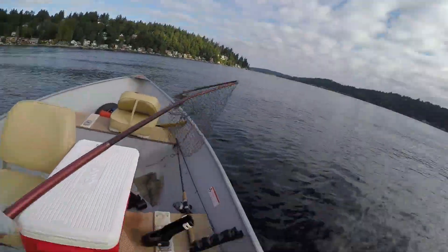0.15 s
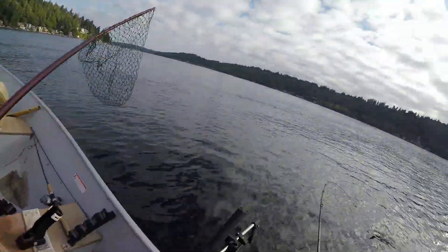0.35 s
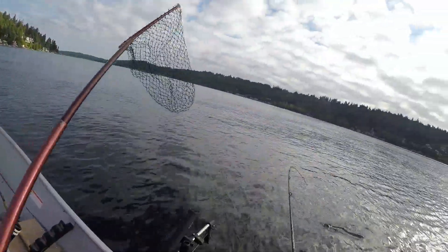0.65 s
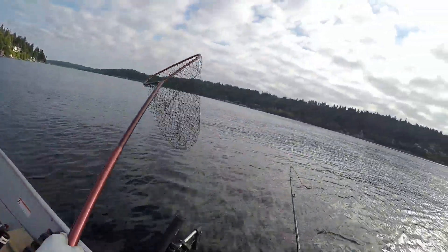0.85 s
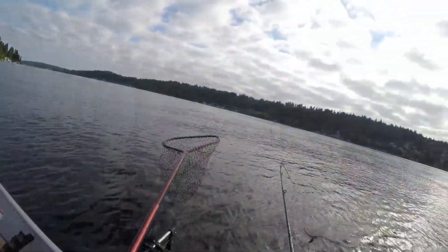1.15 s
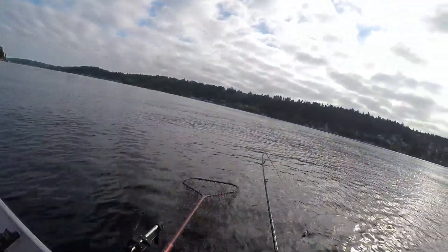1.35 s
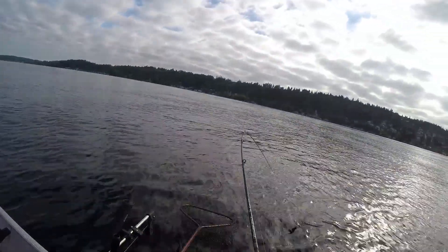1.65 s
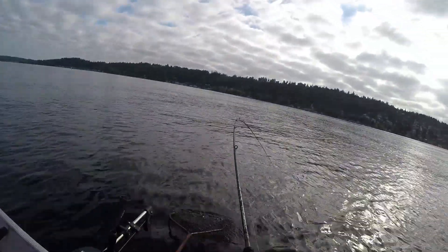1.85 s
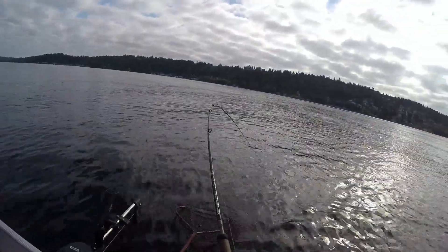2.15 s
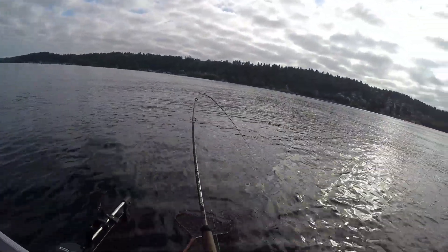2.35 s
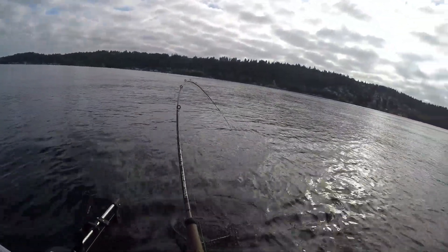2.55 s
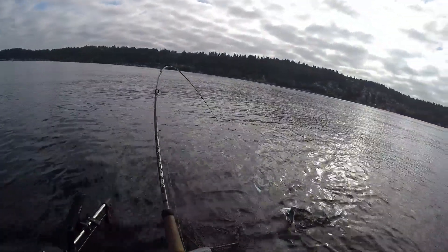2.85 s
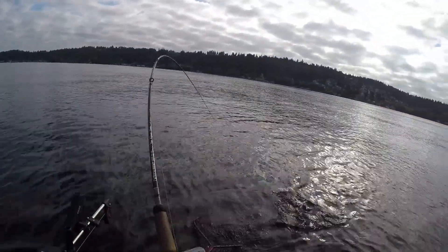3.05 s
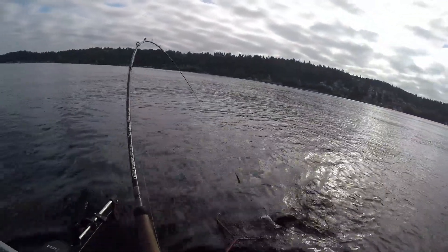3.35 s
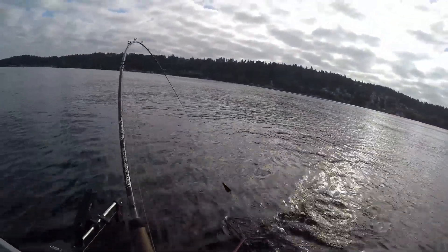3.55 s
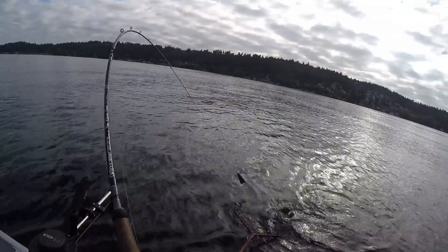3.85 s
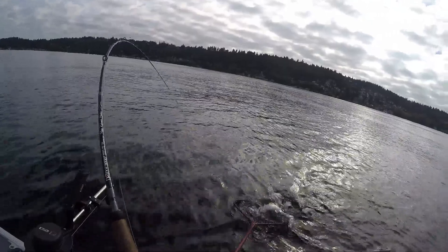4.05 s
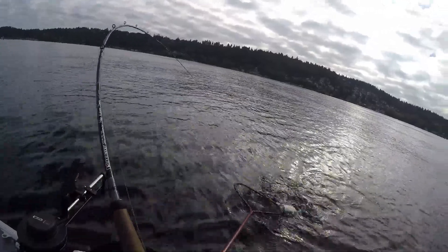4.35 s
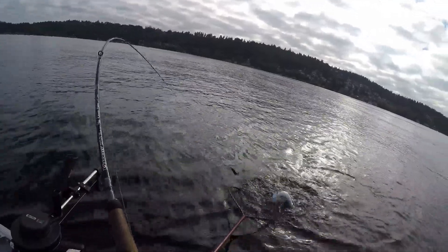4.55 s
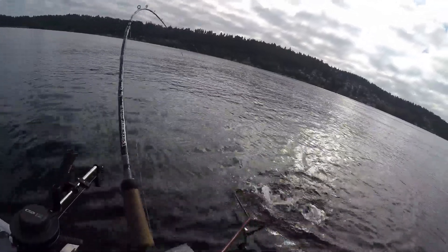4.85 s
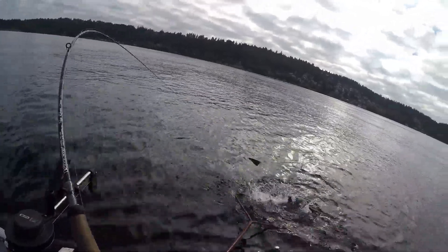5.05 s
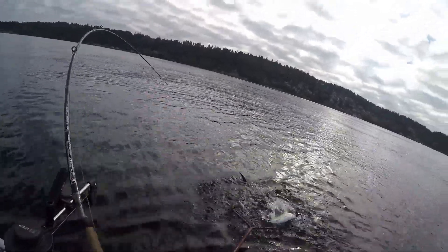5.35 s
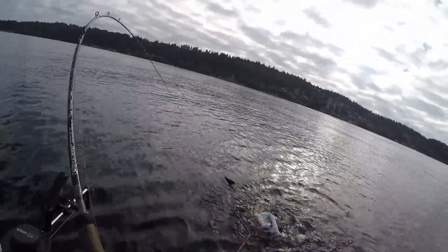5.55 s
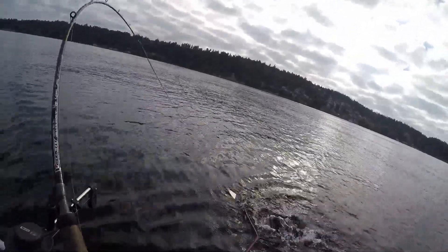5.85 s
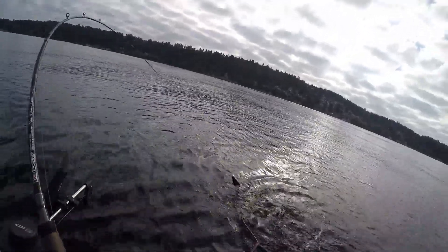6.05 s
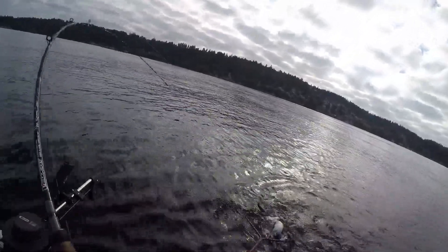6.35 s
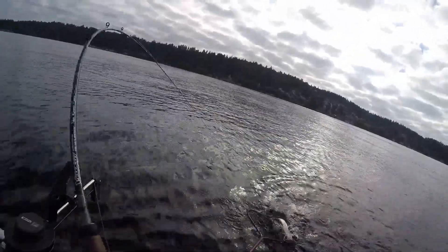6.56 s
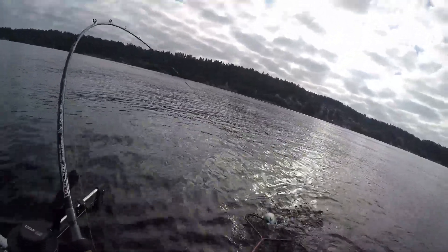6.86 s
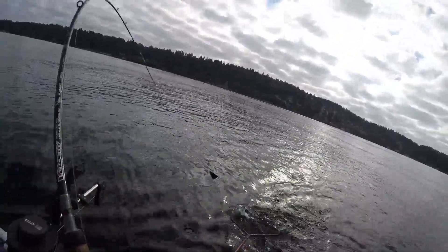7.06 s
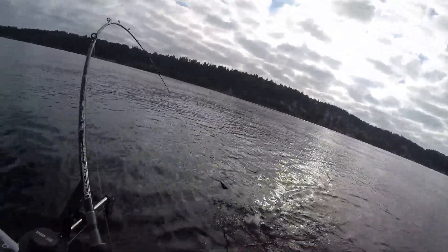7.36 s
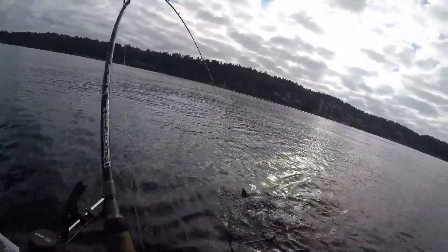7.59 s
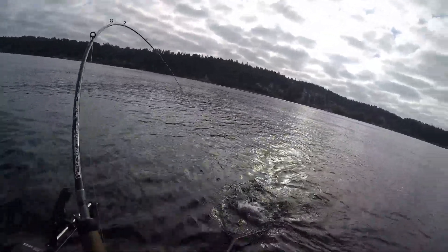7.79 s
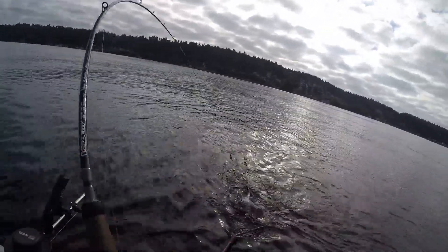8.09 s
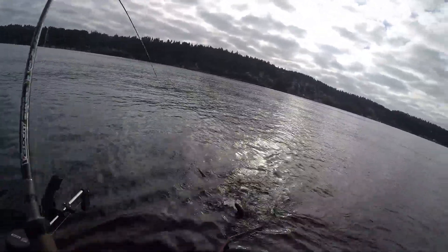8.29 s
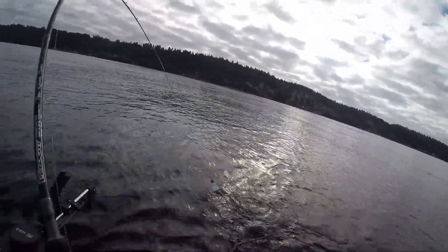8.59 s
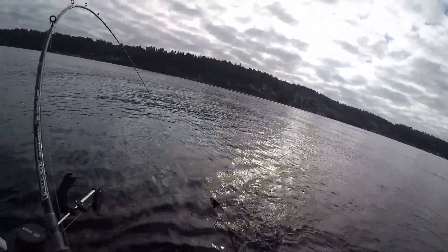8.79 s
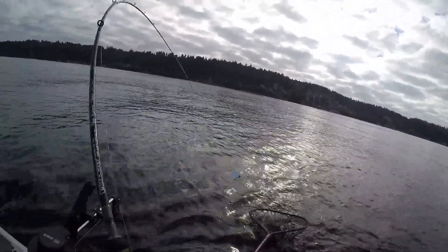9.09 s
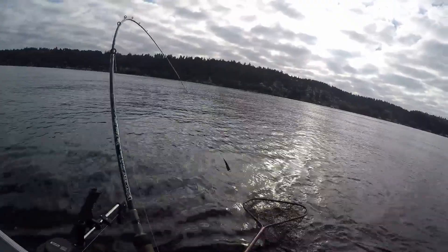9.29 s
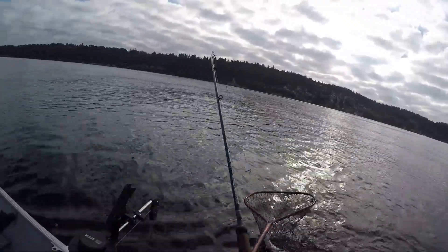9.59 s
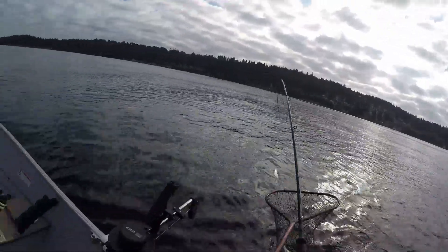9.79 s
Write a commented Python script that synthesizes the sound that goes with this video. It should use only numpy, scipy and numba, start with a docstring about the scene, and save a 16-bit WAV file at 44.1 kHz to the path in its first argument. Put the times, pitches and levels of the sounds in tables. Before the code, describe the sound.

Throughout, a small boat's outboard idles with a low, uneven chug, about six pulses a second, over a soft hiss of lake and low fluttering wind that gusts and bumps a body-worn microphone in a resonant case. At 0.1-0.2 s a net handle rattles with a short sliding scrape; wavelets and hollow gurgles follow, and at 1.4 s the net dips with a soft splash, the handle sliding faintly. Drops plink from 1.6 s. Around 3 s the fish begins to stir, with slaps from 3.4 s; from 4 to 8.4 s it thrashes in bursts, strongest around 5 s, with sharp slaps, churning bubbles, gulping air pockets, spattering drops and fizzing foam. Tackle clinks at 4.55 s; a reel whirrs faintly at 7-7.8 s. A soft thump of wind comes at 7.95 s. After 8.5 s the splashing subsides to drips, laps at 9.3 and 9.7 s, and a brief boat buzz at 9.15 s.

```python
"""On a lake, a hooked fish thrashes beside a small metal boat whose outboard idles with a slow chug.
Periodic firing and crank forces excite the boat's modes; thrown water is random impacts and ringing bubbles.
Air pockets gurgle, wavelets lap at the hull, a landing net's handle rattles and the net dips with a soft
splash, tackle clinks, the reel whirrs briefly.
Wind, as coloured noise, rumbles on a body-worn camera whose closed housing rings at its resonances."""
import sys
import numpy as np
from scipy import signal
from scipy.fft import rfft, irfft
from scipy.io import wavfile
from scipy.ndimage import uniform_filter1d
from numba import njit

SR = 44100
rng = np.random.default_rng(int(sys.argv[2]) if len(sys.argv) > 2 else 0)


def store_pcm(level_fs):
    """Save levels as 16-bit WAV."""
    pcm = np.round(np.clip(level_fs, -1, 1) * 32767).astype(np.int16)
    wavfile.write(sys.argv[1], SR, np.atleast_2d(pcm).T)


N = 437913
TIME = np.arange(N) / SR
CUTOFF_HZ = 15400
STROKE_S = 0.046   # hold of each tail stroke

# how hard the fish works the surface: t/s, relative level/dB
THRASH = [(0, -63.5), (.5, -76), (1.0, -79), (1.8, -69), (2.6, -83.5), (2.95, -66), (3.7, -63), (4.15, -56),
          (4.68, -56), (5.1, -49.5), (5.8, -54.5), (6.35, -54.5), (6.95, -57), (7.4, -52.5), (7.9, -60.5),
          (8.15, -58), (8.5, -65), (8.68, -68.5), (9.93, -67)]
# sharp slaps of tail and falling water: t/s, relative level/dB, pitch of the first drop f/Hz
SLAPS = [(3.426, -39.5, 3750), (3.451, -44, 4160), (3.4665, -40, 3770), (3.531, -43.5, 4000),
         (3.6058, -36.5, 3220), (3.639, -39.5, 3930), (3.726, -36.5, 3130), (3.9555, -35.5, 4000),
         (4.063, -35, 3880), (4.099, -28, 3940), (4.1427, -33.5, 4080), (4.437, -39, 3180),
         (4.487, -36, 4460), (4.5186, -34.5, 3090), (4.757, -30.5, 4330), (4.908, -33.5, 3070),
         (5.1509, -33.5, 3070), (5.4076, -32, 3970), (5.42, -40, 4270), (5.466, -36, 3100),
         (5.64, -34.5, 3060), (5.757, -35, 4050), (5.831, -35.5, 3960), (5.891, -28, 3900),
         (6.131, -35, 4100), (6.371, -37, 3270), (6.539, -31.5, 4000), (6.5475, -33, 3130),
         (6.652, -35.5, 4090), (7.2696, -31, 4370), (7.4435, -36, 4170), (7.743, -29.5, 4200),
         (8.092, -37, 4100), (8.122, -36, 3830), (8.151, -29, 3020), (8.166, -34, 4300),
         (9.022, -38.5, 4030), (9.617, -40, 4440)]
# strokes of the tail: t/s, relative churn level/dB, relative shower level/dB
STROKES = [(2.98, -62, -53), (3.42, -71, -65), (3.58, -59, -67), (3.725, -74, -56.5), (3.87, -58, -58),
           (3.909, -48, -53), (4.055, -42.5, -46), (4.63, -44.5, -69), (4.753, -50, -43.5),
           (4.97, -43, -48.5), (5.13, -47, -47), (5.22, -54, -50), (5.27, -57, -51), (5.46, -63, -54),
           (5.58, -57, -46), (5.73, -46, -59), (5.82, -62, -46), (6.119, -60, -46.5), (6.61, -63, -51.5),
           (6.75, -64, -55), (6.98, -47, -72), (7.128, -64, -47.5), (7.24, -49, -52.5), (7.43, -46.5, -60),
           (7.73, -74, -50.5), (8.02, -75, -57.5), (8.15, -46.5, -53), (8.345, -49, -52.5)]


def from_db(db):
    """A level in decibels is twenty times the logarithm of the amplitude ratio returned."""
    return 10 ** (np.asarray(db) / 20)


def rms_one(x):
    """Division by the root mean square gives unit power."""
    return x / np.sqrt(np.mean(x ** 2) + 1e-20)


def in_time(rows):
    """Linear interpolation gives each column of a time curve at every sample."""
    s, *columns = np.transpose(rows)
    return [np.interp(TIME, s, c) for c in columns]


def add(track, s, sound):
    """Superposition: a sound is summed into the track from time s."""
    start = max(0, round(s * SR))
    track[start:start + len(sound)] += sound[:max(0, N - start)]


def drift(rate):
    """A slow random modulation: Gaussian knots, rate per second, joined linearly to unit power."""
    knots = rng.standard_normal(N // 40)
    return rms_one(np.interp(TIME * rate, np.arange(len(knots)), knots))


def shape(x, gain_db, size=8192):
    """Minimum-phase filtering: folding the cepstrum makes a gain over frequency causal."""
    hz = np.maximum(np.fft.rfftfreq(size, 1 / SR), 1)
    cepstrum = irfft(np.log(from_db(gain_db(hz))))
    cepstrum[1:size // 2] *= 2
    cepstrum[size // 2 + 1:] = 0
    impulse_response = irfft(np.exp(rfft(cepstrum)))
    return signal.oaconvolve(x, impulse_response)[:len(x)]


def colour(x, spectrum):
    """Spectral shaping: gains (Hz, dB) are interpolated over log frequency."""
    hz, db = np.transpose(spectrum)
    return shape(x, lambda f: np.interp(np.log(f), np.log(hz), db))


def housing(x):
    """Enclosure resonance: outside sound reaches the microphone through the ringing case."""
    # case resonances: f/Hz, Gaussian half width/Hz, lift/dB
    resonances = [(985, 193, 11.5), (1614, 57, 11.5), (2687, 137, 10.5), (3104, 143, 14), (4072, 377, 14),
                  (6330, 233, 8), (6650, 58, 6), (8350, 340, 3), (9760, 180, 8), (10820, 320, 7.5),
                  (12450, 260, 5), (13380, 62, 10)]

    def lift_db(f):
        return sum(db * np.exp(-.5 * ((f - hz) / width) ** 2) for hz, width, db in resonances)
    return shape(x, lift_db)


def resonate(x, hz, width):
    """Modal resonance: two cascaded two-pole sections give steep skirts, at unit power."""
    r = np.exp(-np.pi * width * np.sqrt(2) / SR)
    section = [1 - r, 0, r - 1, 1, -2 * r * np.cos(2 * np.pi * hz / SR), r * r]
    return rms_one(signal.sosfilt([section, section], x))


def swells(rows, attack_s, release_s):
    """Exponential relaxation: strength of sounds (s, length, dB) that build up, hold and die away."""
    out, age = np.zeros(N), TIME[:2 * SR]
    for s, length, db in rows:
        rise = 1 - np.exp(-age / attack_s)
        fall = np.exp(-np.maximum(age - length, 0) / release_s)
        add(out, s, from_db(db) * rise * fall)
    return out


def blows(rows, rise_s, fade_s):
    """Impulsive excitation: strength of blows (s, dB) that fade at once."""
    return swells([(s, 0, db) for s, db, *_ in rows], rise_s, fade_s)


def droplets(per_s, spread_db):
    """Shot noise: random impacts whose sizes vary exponentially in decibels, at unit power."""
    sizes = from_db(spread_db * np.minimum(rng.exponential(1, N), 4))
    landed = rng.random(N) < per_s / SR
    return rms_one(sizes * rng.standard_normal(N) * landed)


@njit
def ring_bubbles(starts, heights, turn, decay, rise):
    """Damped oscillation: a sum of dying tones, each rising by a share of its pitch as it fades."""
    out = np.zeros(N)
    for k in range(len(starts)):
        height, phase, step = heights[k], 0., turn[k]
        fade, climb = np.exp(-decay[k]), turn[k] * rise[k] * decay[k]
        for i in range(starts[k], min(N, starts[k] + int(5 / decay[k]))):
            out[i] += height * np.cos(phase)
            height, phase, step = height * fade, phase + step, step + climb
    return out


def plinks(clicks, low_hz, high_hz, t60, glide=0.036):
    """Bubble resonance: each impact traps a tiny bubble that rings at its own pitch and glides upward."""
    starts = np.flatnonzero(clicks)
    pitch, rise = rng.random((2, N))[:, starts]
    hz = low_hz * (min(high_hz, CUTOFF_HZ) / low_hz) ** pitch
    # small bubbles die sooner: t60 seconds holds at the lowest pitch
    decay = np.log(1000) * np.sqrt(hz / low_hz) / (t60 * SR)
    heights = clicks[starts] * 2 * np.sqrt(decay * hz / hz.mean())   # even in power per Hz
    return ring_bubbles(starts, heights, 2 * np.pi * hz / SR, decay, glide * rise)


def wet(x):
    """Linear filtering: impacts take the colour of spray and of the housing, at unchanged power."""
    # spray before the housing: f/Hz, gain/dB
    spray_colour = [(200, -8), (600, 4), (1300, -1), (2000, 5), (4300, 7), (5100, 3.5), (7500, -1.5),
                    (12000, -3.5), (15500, -7)]
    out = housing(colour(x, spray_colour))
    return out * np.std(x) / np.std(out)


def motor(fire_phase=0.944, fire_width=0.024, turn_phase=0.17, turn_depth=2.9, hum_hz=273):
    """Forced vibration: a cylinder fires every second crank turn; firings and turns shake the boat's modes."""
    # idling speed: t/s, firings per s
    idle = [(0, 6.25), (1.5, 6.33), (4.5, 6.33), (5.5, 6.22), (6.5, 6.33), (7.5, 6.35), (8.5, 6.2),
            (9.93, 6.24)]
    # motor strength: t/s, relative level/dB, extra boom of the lowest modes/dB
    strength = [(0, -4, 7.5), (1.2, -0.5, 4), (2.4, -2, 6.5), (3.3, 1, 5.5), (4.3, -1, -7.5), (6, 0, 2.5),
                (7.5, -0.5, 1), (8.7, 1, 2), (9.6, -2, 0.5), (9.93, -4, 4)]
    # boat and cowling: f/Hz, width/Hz, then relative drive/dB from firing, from crank turns, from steady shake
    boat_modes = [(85.4, 25, -71, -70, -58), (129.5, 8.4, -79, -60.5, -60),
                  (140.8, 18.7, -72.5, -58.5, -69), (169.7, 86, -84, -57.5, -61.5),
                  (228.3, 37, -56.5, -91, -58.5), (269.4, 21, -56, -77, -64.5),
                  (299, 38.5, -57, -60.5, -58), (314.7, 15.7, -62, -76, -60),
                  (352.3, 21, -68.5, -81, -75.5)]
    # sympathetic buzz of the boat: t/s, length/s, level/dB
    buzzes = [(7.2, 0.079, -42), (9.15, 0.63, -50.5)]
    cycle = np.cumsum(in_time(idle)[0]) / SR
    level_db, boom_db = in_time(strength)
    from_firing = (cycle - fire_phase + .5) % 1 - .5   # in cycles
    firing = rms_one(np.exp(-.5 * (from_firing / fire_width) ** 2))
    turning = rms_one(np.exp(turn_depth * np.cos(4 * np.pi * (cycle - turn_phase))))
    out = 0
    for hz, width, fire_db, turn_db, steady_db in boat_modes:
        fire_power = (from_db(fire_db) * firing) ** 2
        turn_power = (from_db(turn_db) * turning) ** 2
        force = np.sqrt(fire_power + turn_power + from_db(steady_db) ** 2)
        shake = np.cos(2 * np.pi * hz * TIME + 1.955 * drift(35))   # even in strength, loose in phase
        mode = np.sqrt(np.mean(force ** 2)) * resonate(force * shake, hz, width)
        out = out + mode * from_db(boom_db * (hz < 160))
    tone = rms_one(np.sin(2 * np.pi * hum_hz * TIME + 0.67 * drift(6)))
    hum = swells(buzzes, attack_s=0.086, release_s=0.048) * tone
    return out * from_db(level_db) + hum


def wind(flutter_db=-0.5, gust_db=1.0, gust_top_hz=70, bump_s=0.0059):
    """Turbulent pressure as coloured noise: a fluttering breeze, short deeper gusts, soft damped bumps."""
    # steady breeze on the camera: t/s, level/dB before flutter
    breeze = [(0, -33), (1.2, -35.5), (2.6, -37), (4.0, -33.5), (5.1, -31), (6.4, -34), (8.3, -34),
              (9.93, -33)]
    # spectrum of the breeze: f/Hz, gain/dB
    wind_colour = [(8, -8), (14, 4.5), (25, 1.5), (40, -7), (60, -11.5), (100, -23), (180, -29), (400, -40),
                   (900, -70)]
    # gusts on top of it: t/s, length/s, relative level/dB
    gusts = [(.2, 0.15, -30.5), (3.15, 0.033, -29), (3.5, 0.18, -30), (4.42, 0.15, -29.5),
             (5.14, 0.11, -32), (5.38, .12, -26.5), (5.92, 0.17, -30.5), (6.76, 0.14, -23.5),
             (7.3, 0.15, -28), (7.88, 0.13, -34)]
    # soft bumps on the camera: t/s, relative level/dB
    bumps = [(3.53, -25.5), (4.446, -25.5), (5.418, -26), (6.876, -36), (7.952, -16), (8.469, -26)]
    air = colour(rng.standard_normal(N), wind_colour)
    low_pass = signal.butter(2, gust_top_hz, fs=SR, output="sos")
    deep = signal.sosfilt(low_pass, colour(rng.standard_normal(N), wind_colour))
    # even out the slow chance swells of the noise
    air, deep = (v / np.sqrt(uniform_filter1d(v ** 2, size=6000)) for v in (air, deep))
    out = from_db(in_time(breeze)[0] + flutter_db * drift(9.7)) * air
    out = out + from_db(gust_db) * swells(gusts, attack_s=0.01, release_s=0.043) * deep
    swing = TIME[:SR // 5] / bump_s
    for s, db in bumps:
        add(out, s, from_db(db) * swing * np.exp(1 - swing) * np.sin(2.09 * swing))
    return out


def lake(level_db=-59.5, ripple_db=0.7):
    """Broadband noise: a soft, faintly restless hiss of lake and motor under everything."""
    # spectrum of the hiss: f/Hz, gain/dB
    hiss = [(150, 5.5), (400, 6), (600, -7), (1000, -3.5), (1300, -10.5), (2400, -7.5), (4200, -11.5),
            (5000, -12), (6500, -14.5), (8000, -18), (13000, -21.5), (15500, -35)]
    return from_db(level_db + ripple_db * drift(14)) * rms_one(colour(rng.standard_normal(N), hiss))


def spray(spray_db=-3.0, shower_db=-5.0, slap_db=-9.0, lead_s=0.0036, crack_db=-1.0, crack_top_hz=4800,
          patter_db=-2.0, clump_db=1.5, mist_db=-14.5, foam_db=-7.0, foam_s=0.061):
    """Impact noise and bubble resonance: thrown water patters and plinks, foam fizzes, slaps crack."""
    # a slap swells just before it cracks
    slap_rows = [(s - lead_s, lead_s, db) for s, db, _ in SLAPS]
    slap = swells(slap_rows, attack_s=0.008, release_s=0.0071)
    shower_rows = [(s, STROKE_S, db + shower_db) for s, _, db in STROKES]
    showers = swells(shower_rows, attack_s=0.015, release_s=0.021)
    rain = np.hypot(from_db(in_time(THRASH)[0] + spray_db), showers)
    clumps = rms_one(from_db(clump_db * drift(45)))
    thrown = np.hypot(rain * clumps, from_db(slap_db) * slap)
    crowding = (thrown / thrown.mean()) ** .8   # the more water is thrown, the denser the drops
    impacts = thrown / np.sqrt(crowding) * droplets(per_s=2000 * crowding, spread_db=2.0)
    drops = plinks(impacts, low_hz=1144, high_hz=7230, t60=0.022)
    patter = from_db(patter_db) * thrown * droplets(per_s=12000, spread_db=1.2)
    # foam lingers after the rain that feeds it
    linger = np.exp(-1 / (foam_s * SR))
    foam_strength = signal.lfilter([1 - linger], [1, -linger], rain)
    foam = from_db(foam_db) * foam_strength * rng.standard_normal(N)
    smack = from_db(crack_db) * blows(SLAPS, rise_s=0.00042, fade_s=0.0014) * rng.standard_normal(N)
    smack = signal.sosfilt(signal.butter(2, crack_top_hz, fs=SR, output="sos"), smack)
    # heavy showers also raise a hissing mist of the finest bubbles
    fine = from_db(mist_db) * rain * np.sqrt(rain / rain.max())
    mist = plinks(fine * droplets(per_s=5000, spread_db=3.5), low_hz=5530, high_hz=14500, t60=0.012)
    return wet(drops + patter + foam + smack) + housing(mist)


def churn(thrash_db=-8.0, stroke_db=-9.5, lapping_db=-68, wash_db=-5, cycles=16, glide=0.38, spread_db=3.5,
          count=1100, size=2500):
    """Bubble resonance: stirred-in air rings as a crowd of bubbles, rising in pitch, over a soft wash."""
    bubbles, age = np.zeros(N), TIME[:size]
    for when, pitch, strength, rise in rng.random((count, 4)):
        hz = 420 * 2 ** (2 * pitch ** 1.2)
        life = age * hz / cycles   # each bubble falls 60 dB in the given number of cycles
        phase = 2 * np.pi * np.cumsum(hz * (1 + glide * rise * np.minimum(life, 1))) / SR
        envelope = (1 - np.exp(-life * 20)) * from_db(-60 * life)
        height = from_db(-spread_db * np.log(strength + 0.024) - 5 * pitch)
        add(bubbles, when * N / SR, height * envelope * np.sin(phase))
    wash_colour = [(200, -13.0), (420, -2.5), (900, -1.5), (1300, -8.5), (2500, -15.0), (6000, -56)]
    wash = colour(rng.standard_normal(N), wash_colour)
    stroke_rows = [(s, STROKE_S, db + stroke_db) for s, db, _ in STROKES]
    surges = swells(stroke_rows, attack_s=0.01, release_s=0.057)
    stirred = np.hypot(from_db(in_time(THRASH)[0] + thrash_db), surges)
    water = rms_one(housing(rms_one(bubbles) + from_db(wash_db) * rms_one(wash)))
    return water * np.hypot(stirred, from_db(lapping_db))


def net(rattle_db=-3.0, ring_hz=4010, ring_width_hz=170):
    """Impact and friction: the handle rattles, the net dips with a soft splash, the sliding tube rings."""
    # knocks of the handle, then the net dipping into the water with a soft splash (from 1.4 s):
    # t/s, relative level/dB, fade/s
    knock_and_dip_rows = [(0.118, -40, 0.019), (0.1674, -40.5, 0.012), (0.195, -45, 0.008),
                          (0.211, -40.5, 0.0048), (1.425, -54, .012), (1.447, -53, 0.023)]
    # spectrum of knocks and dip before the housing: f/Hz, gain/dB
    net_colour = [(300, 8), (900, -2), (2000, -2.5), (3200, 4.5), (4200, 6.5), (6200, 0.5), (9000, -13),
                  (15000, -12)]
    # sliding of the handle through the hand: t/s, length/s, level/dB
    slide_rows = [(.07, .08, -60), (1.55, 0.13, -65), (1.72, .25, -71), (9.6, 0.39, -71.5)]
    strength = sum(blows([(s, db + rattle_db)], rise_s=0.00069, fade_s=fade)
                   for s, db, fade in knock_and_dip_rows)
    impacts = rms_one(housing(colour(droplets(per_s=7000, spread_db=2.5), net_colour)))
    tube = resonate(droplets(per_s=2000, spread_db=2), ring_hz, ring_width_hz)
    slide = swells(slide_rows, attack_s=0.017, release_s=0.038) * tube
    return strength * impacts + slide


def laps():
    """Shot noise under a decaying envelope: a wavelet swells at the hull and drains in a soft crackle."""
    # wavelets: t/s, level/dB
    wavelets = [(.315, -63), (.47, -60), (1.835, -54.5), (2.235, -65), (1.88, -59.5), (3.365, -58),
                (9.269, -54.5), (9.729, -58)]
    # spectrum of the crackle: f/Hz, gain/dB
    lap_colour = [(250, -37), (600, 7), (1400, -5.5), (2200, 2), (3200, -3), (7000, -13.5), (15000, -33)]
    swell = blows(wavelets, rise_s=0.0019, fade_s=0.03)
    return swell * rms_one(colour(droplets(per_s=830, spread_db=-0.5), lap_colour))


def gurgles(waver=.085, waver_per_s=380):
    """Frequency modulation: a drawn-out air pocket swells and fades as its note sweeps and wavers."""
    # long gurgles: t/s, length/s, first pitch f/Hz, last pitch f/Hz (both before waver), peak level/dB
    pockets = [(.555, .06, 357, 333, -38.5), (2.234, 0.052, 328, 367, -43),
               (2.263, 0.037, 1300, 1850, -61.5), (2.278, 0.047, 355, 1160, -52),
               (2.34, .06, 1750, 2250, -56), (4.442, 0.063, 342, 363, -43), (5.274, 0.033, 710, 1016, -48),
               (5.279, 0.035, 287, 490, -40.5), (6.163, 0.055, 327, 1060, -51.5),
               (7.254, 0.036, 680, 1023, -51.5)]
    out, wobble = np.zeros(N), drift(waver_per_s)
    for s, length, first_hz, last_hz, db in pockets:
        progress = np.linspace(0, 1, int(length * SR))
        sweep_hz = first_hz * (last_hz / first_hz) ** progress
        hz = sweep_hz * (1 + waver * wobble[int(s * SR):][:len(progress)])   # a share of the pitch
        envelope = np.sqrt(np.abs(np.sin(np.pi * progress)))
        add(out, s, from_db(db) * envelope * np.sin(2 * np.pi * np.cumsum(hz) / SR))
    return out


def gulps(rough=0.58, onset_s=0.002, fade_s=0.014, typical_hz=500, slosh_db=-12, slosh_low_hz=430,
          slosh_high_hz=1050, count=7000):
    """Cavity resonance: a closing air pocket sloshes and rings unevenly; deeper notes ring longer."""
    # air pockets closing: t/s, first pitch f/Hz, relative level/dB, rise/octaves per s (at most 1 octave up)
    pockets = [(.855, 1060, -47, -4), (1.005, 492, -47, 7), (1.30, 348, -41, -1), (1.553, 1030, -42.5, -2),
               (1.87, 2270, -45, -10), (2.115, 1640, -49, 6), (2.24, 664, -47, -15),
               (2.383, 2200, -45, -14), (2.87, 390, -40, 1), (2.984, 940, -44, 10), (3.01, 876, -40, 23),
               (3.369, 600, -49, 12), (3.592, 1010, -38, 9), (3.946, 754, -45.5, 17),
               (4.075, 493, -43, -12.5), (4.08, 1110, -44, -12), (4.233, 910, -42.5, 11),
               (4.328, 610, -49, 17), (4.413, 470, -49, 6.5), (4.415, 780, -40.5, 16),
               (4.524, 1040, -46, 9), (4.693, 825, -51, 2), (4.79, 820, -45, 2), (4.864, 1050, -41, 5),
               (5.115, 719, -44, 5), (5.228, 937, -42, 3), (5.338, 446, -45, 0), (5.42, 380, -36.5, -2),
               (5.475, 664, -43.5, 8), (5.836, 442, -37.5, 12), (5.838, 1000, -38.5, -11.5),
               (6.274, 1150, -47, -4), (6.619, 430, -40.5, 16), (7.21, 627, -43.5, 22),
               (7.797, 1054, -43, 6)]
    out, age, wobble = np.zeros(N), TIME[:count], drift(170)
    for k, (s, hz, db, rise) in enumerate(pockets):
        # the pitch glides as the pocket nears the surface
        phase = 2 * np.pi * np.cumsum(hz * 2 ** np.minimum(rise * age, 1)) / SR
        envelope = (1 - np.exp(-age / onset_s)) * np.exp(-age / fade_s * hz / typical_hz)
        uneven = rough * wobble[k * count:(k + 1) * count]   # radians
        add(out, s, from_db(db) * envelope * np.sin(phase + uneven))
    band = signal.butter(2, [slosh_low_hz, slosh_high_hz], "band", fs=SR, output="sos")
    slosh = rms_one(signal.sosfilt(band, rng.standard_normal(N)))
    unrest = rms_one(from_db(in_time(THRASH)[0] / 2))   # pockets in churned water slosh more
    slosh_rows = [(s, db + slosh_db) for s, _, db, _ in pockets]
    return out + blows(slosh_rows, rise_s=onset_s, fade_s=fade_s) * unrest * slosh


def first_drops(fade_s=0.0019, onset_s=0.00063, count=1500):
    """Bubble resonance: a heavy drop, alone or at the head of a slap, gives one crisp plink."""
    # lone heavy drops falling back: t/s, relative level/dB, pitch f/Hz
    drips = [(1.5778, -46, 3900), (2.1755, -46, 3920), (2.759, -43, 4130), (2.8793, -45, 4330),
             (3.0884, -44, 4370), (3.1592, -44, 4160), (3.2326, -45, 4400), (3.331, -44, 3810),
             (3.6594, -46, 2640), (3.8467, -38.5, 4140), (3.869, -42, 2550), (3.921, -34, 3850),
             (4.2315, -39, 3020), (4.4696, -38, 4100), (5.0464, -30, 3920), (5.3587, -35, 3030),
             (5.8544, -36, 4300), (6.4093, -39, 4310), (7.6331, -36, 3710), (8.518, -44, 2960),
             (8.7789, -43, 3160), (9.0927, -44, 4190), (9.2978, -41, 4080)]
    out, age = np.zeros(N), TIME[:count]
    envelope = (1 - np.exp(-age / onset_s)) * np.exp(-age / fade_s)
    for rows in (SLAPS, drips):
        for s, db, hz in rows:
            add(out, s, from_db(db) * envelope * np.sin(2 * np.pi * hz * age))
    return out


def flecks(scatter_s=.009, spread_octaves=0.208, fade_s=0.00087, count=20, size=2500):
    """Superposed bubble tones: a pinch of fine spray lands within milliseconds, tinkling around one pitch."""
    # clusters of tiny bubbles: t/s, level/dB, middle pitch f/Hz
    clusters = [(3.6404, -65, 11000), (3.7244, -66, 11500), (3.956, -55.5, 7500), (4.024, -57.5, 6500),
                (4.1929, -59, 12500), (4.3575, -66, 12500), (4.487, -57, 6500), (4.5191, -58, 11000),
                (5.1492, -54, 11000), (5.2664, -56, 11500), (5.4074, -50, 7860), (5.418, -50.5, 6450),
                (5.465, -56, 12000), (5.558, -54, 6440), (5.642, -58, 6600), (5.8247, -57, 11500),
                (5.862, -54.5, 6330), (5.995, -58, 11500), (6.127, -51.5, 6600), (6.6167, -55.5, 10400),
                (6.765, -64, 8450), (6.815, -64, 8500), (7.3776, -62, 12000), (7.529, -60, 6900),
                (7.94, -57.5, 11500), (7.98, -61, 11500), (8.081, -56.5, 11900), (8.1239, -60, 12000),
                (8.3699, -59.5, 10900), (9.76, -60.5, 6300)]
    out = np.zeros(N)
    for s, db, middle_hz in clusters:
        hz = middle_hz * 2 ** (spread_octaves * rng.standard_normal((count, 1)))
        landing_s = scatter_s * np.sum(rng.random((count, 2)), axis=1, keepdims=True)
        age = np.maximum(TIME[:size] - landing_s, 0)
        cluster = housing(np.sum(np.exp(-age / fade_s) * np.sin(2 * np.pi * hz * age), axis=0))
        strength = np.sqrt(np.sum(cluster ** 2) / (scatter_s * SR))
        add(out, s - scatter_s / 2, from_db(db) * cluster / strength)
    return out


def clink(start_s=4.55):
    """Modal ringing: a piece of tackle is knocked and its modes die away."""
    # modes of the tackle: f/Hz, relative level/dB, fade/s
    modes = [(3020, -40.5, 0.019), (6800, -40.5, 0.011)]
    out = 0
    for hz, db, fade in modes:
        tone = np.sin(2 * np.pi * hz * TIME + 0.92 * drift(170))
        out = out + blows([(start_s, db)], rise_s=0.001, fade_s=fade) * tone
    return out


def reel(grind=.33, grind_hz=260):
    """Gear tones proportional to speed: a rough whirr, rising in pitch as the reel speeds up."""
    # turns of the reel: t/s, length/s, relative level/dB
    spins = [(7.03, 0.063, -56), (7.29, .5, -58.5), (7.41, 0.12, -56.5), (7.565, 0.024, -52)]
    # gear tones at full speed: f/Hz, width/Hz, relative level/dB
    gear_tones = [(1020, 65, -5.5), (1503, 240, -12.5)]
    # speed of the reel: t/s, share of full speed
    speed = [(7.07, 0.93), (7.34, 0.99), (7.42, 1)]
    turns, whirr = np.cumsum(in_time(speed)[0]) / SR, 0
    for hz, width, db in gear_tones:
        loose_phase = np.exp(1.25j * drift(width))
        unevenness = loose_phase + grind * (drift(grind_hz) + 1j * drift(grind_hz))
        whirr = whirr + from_db(db) * rms_one(np.real(unevenness * np.exp(2j * np.pi * hz * turns)))
    return swells(spins, attack_s=0.009, release_s=0.021) * whirr


def scene():
    """Free field: the sources superpose on open water without reverberation."""
    fish = spray() + flecks() + first_drops() + churn()
    water = gulps() + gurgles() + laps()
    boat = net() + clink() + reel() + motor()
    return (fish + water + boat + wind() + lake())[None]


def record(dry):
    """Band limitation: an elliptic low-pass cuts the top steeply."""
    return signal.sosfilt(signal.ellip(10, .2, 80, CUTOFF_HZ, fs=SR, output="sos"), dry)


dry = scene()
out = record(dry)
store_pcm(out)
```